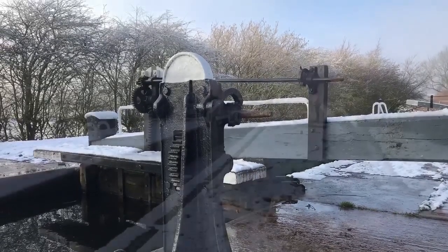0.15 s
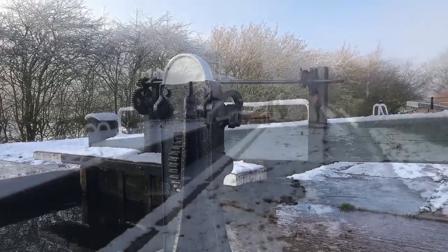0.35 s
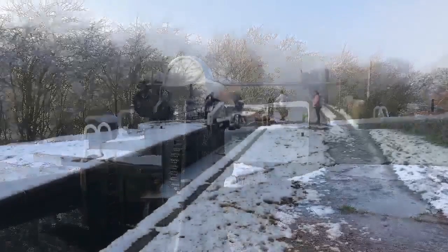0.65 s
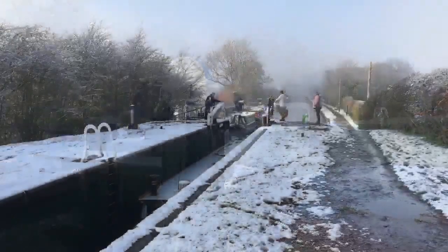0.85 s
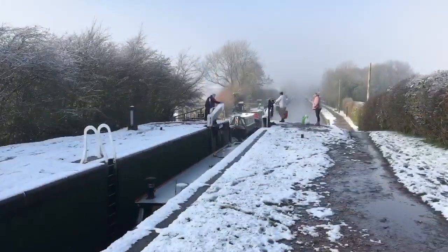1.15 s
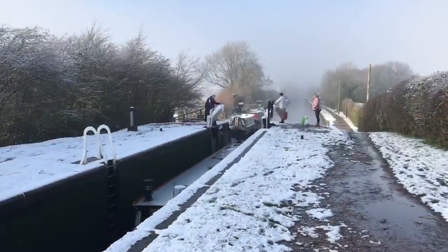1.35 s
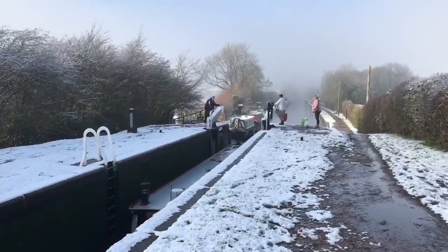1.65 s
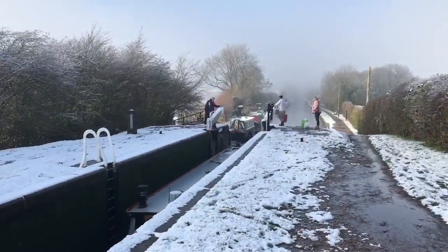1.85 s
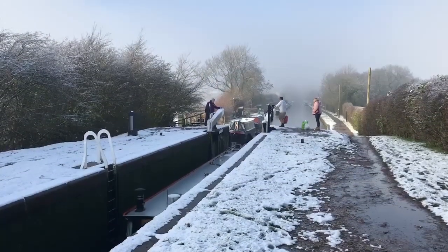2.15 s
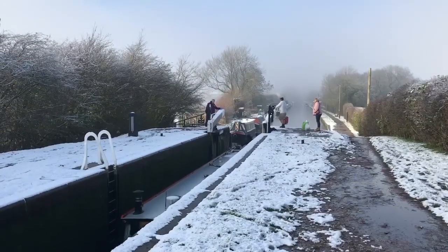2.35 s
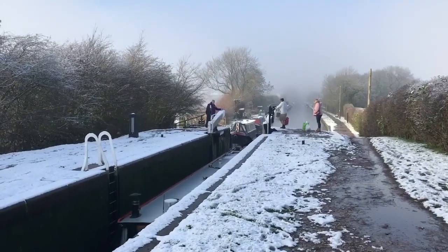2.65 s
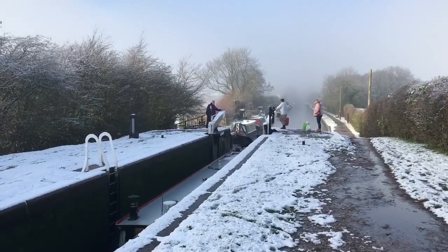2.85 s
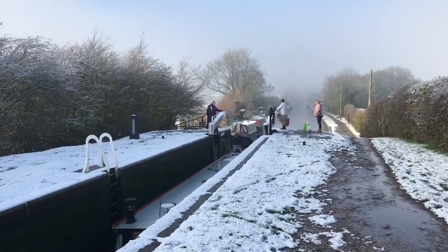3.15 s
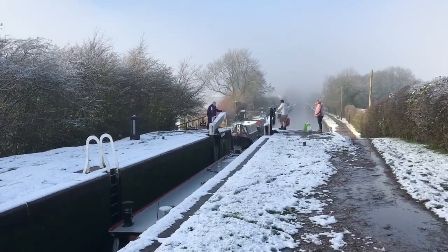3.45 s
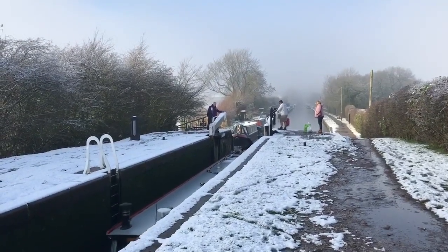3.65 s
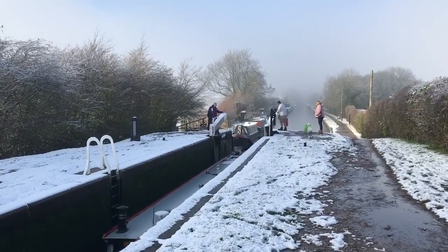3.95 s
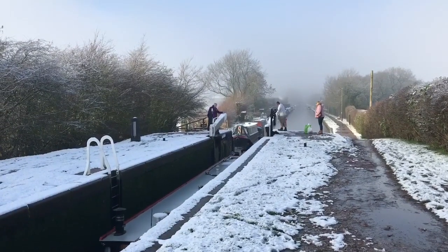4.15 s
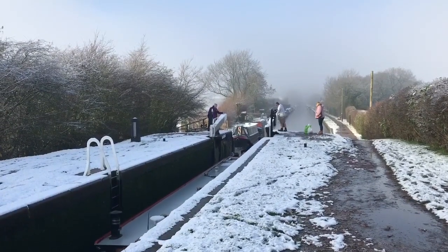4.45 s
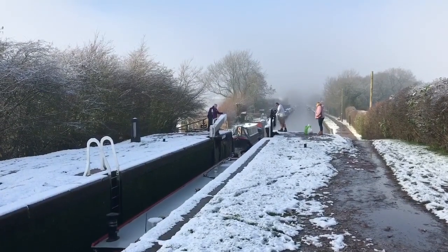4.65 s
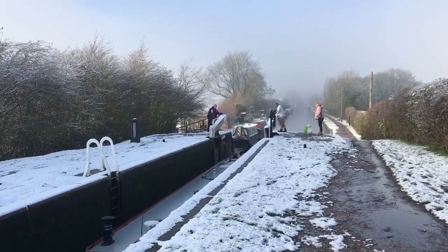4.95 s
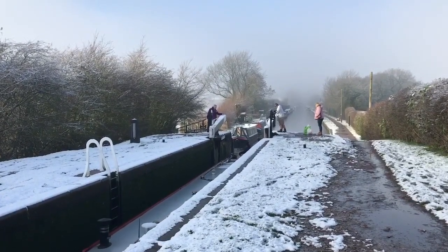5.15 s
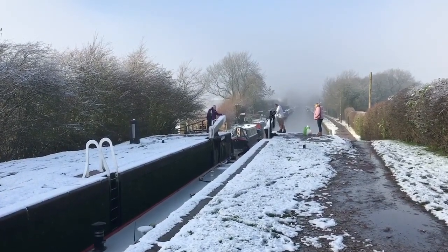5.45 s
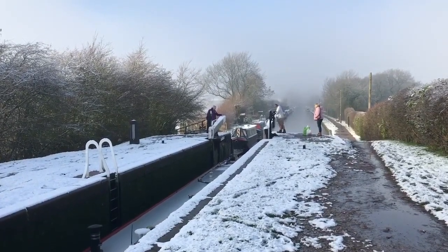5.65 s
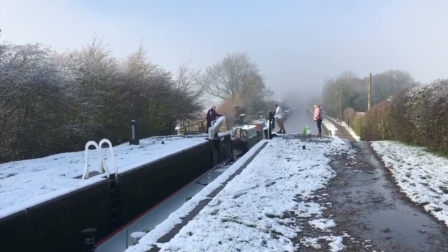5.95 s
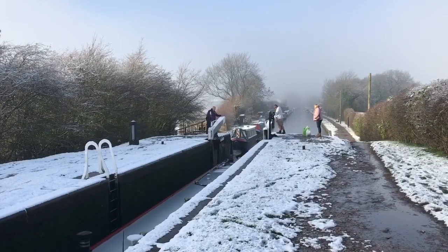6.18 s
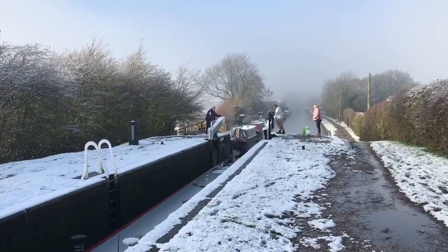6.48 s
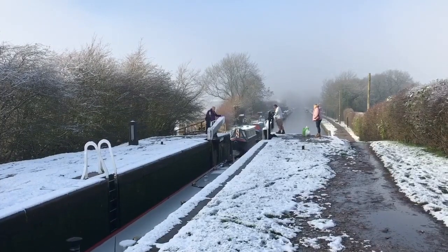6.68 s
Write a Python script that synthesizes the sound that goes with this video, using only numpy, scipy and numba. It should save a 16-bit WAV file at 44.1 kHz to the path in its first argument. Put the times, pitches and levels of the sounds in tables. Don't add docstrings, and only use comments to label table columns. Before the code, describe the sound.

Water hisses and trickles through leaking canal lock gates while a boat diesel idles low, sparrows chirp far off, and the engine finally revs.

```python
import sys
import numpy as np
from scipy import signal
from scipy.fft import rfft, irfft
from scipy.io import wavfile
from scipy.ndimage import uniform_filter1d
from numba import njit

SR = 44100
rng = np.random.default_rng(int(sys.argv[2]) if len(sys.argv) > 2 else 0)


def digitize_waveform(pressure):
    field = np.atleast_2d(pressure).T
    bounded = np.clip(field, -1, 1)
    quanta = np.round(bounded * 32767).astype(np.int16)
    wavfile.write(sys.argv[1], SR, quanta)


def how_loud(loudness_db):
    steps = np.asarray(loudness_db, float) / 20
    return 10 ** steps


N = 300699
FADE_START_S = .064


def level(x, db):
    return x * how_loud(db) / np.sqrt(np.mean(x ** 2))


def columns(table):
    s, *rest = np.transpose(table)
    return [np.interp(np.arange(N) / SR, s, c) for c in rest]


def walk(rate_hz):
    hold = int(SR / rate_hz)
    steps = np.repeat(rng.standard_normal(N // hold + 1), hold)
    return 1.3 * uniform_filter1d(uniform_filter1d(steps, hold), hold)[:N]


def colour(x, spectrum):
    hz, db = np.transpose(spectrum)
    f = np.maximum(np.arange(N // 2 + 1) * SR / N, 1)
    return irfft(rfft(x) * how_loud(np.interp(np.log(f), np.log(hz), db)), N)


def bandpass(x, lo_hz, hi_hz):
    return signal.sosfilt(signal.butter(2, [lo_hz, hi_hz], "band", fs=SR, output="sos"), x)


@njit
def grains(start, hz, t60, size, glide, rise):
    out = np.zeros(N)
    for k in range(len(start)):
        n, phase = int(t60[k] * SR) + 2, 0.
        for i in range(min(n, N - start[k])):
            phase += 2 * np.pi * hz[k] * (1 + (glide[k] - 1) * i / n) / SR
            decay = np.exp(-np.log(1000) * i / n)
            attack = min(i / (rise * n + 1), 1.)
            out[start[k] + i] += size[k] * np.sin(phase) * decay * attack
    return out


def shower(count, lo_hz, hi_hz, cycles, scatter_db, glide, density):
    u = rng.random((count, 3)).T
    share = np.cumsum(density)
    start = np.searchsorted(share / share[-1], u[0])
    hz = lo_hz * (hi_hz / lo_hz) ** u[1]
    size = how_loud(-scatter_db * np.log(u[2] + 1e-4)) * np.sqrt(hz)
    return level(grains(start, hz, cycles / hz, size, np.full(count, glide), 0.047), 0)


def bursts(s, hz, db, t60, spread_oct, smear_s, count=5):
    u = rng.standard_normal((len(s), count, 3))
    start = ((s[:, None] + smear_s * u[..., 0] ** 2) * SR).astype(np.int64).ravel()
    pitch = np.clip(hz[:, None] * 2 ** (spread_oct * u[..., 1]), 400, 9500).ravel()
    size = how_loud(db[:, None] + 1.3 * u[..., 2]).ravel()
    return grains(start, pitch, np.full(len(start), t60), size, np.ones(len(start)), 0.042)


def tones(table, rough, wobble_hz, gain_db):
    out, wobble = np.zeros(N), wobble_hz * walk(250)
    for s, length_s, hz0, hz1, db in table:
        i = int(s * SR)
        n = min(int(length_s * SR), N - i)
        hz = np.linspace(hz0, hz1, n) + wobble[i:i + n]
        tone = np.sin(2 * np.pi * np.cumsum(hz) / SR)
        out[i:i + n] += how_loud(db + gain_db) * np.hanning(n) ** .35 * tone
    return out * (1 - rough + rough * walk(350))


def swell():
    fade_s = 0.94
    return np.clip((np.arange(N) / SR - FADE_START_S) / fade_s, 0, 1)


def spray(flow_db):
    # f/Hz, level/dB per Hz
    spectrum = [(200, -37.5), (350, -11), (440, -9.5), (590, -4), (750, -9), (1350, -7), (2250, -5.5),
                (3250, -4.5), (4850, -6.5), (6400, -6), (8600, -9), (9100, -11), (9500, -39.5),
                (10500, -70.5)]
    surge, hiss = walk(30), 0
    for hz in 300 * 2 ** np.arange(0, 5.1, .5):
        flicker_db = 0.54 * surge + 1.16 * walk(16) + 0.5 * walk(5)
        hiss = hiss + how_loud(flicker_db) * bandpass(rng.standard_normal(N), hz / 2 ** 0.25, hz * 2 ** 0.3)
    u = rng.random((2200, 3)).T
    splatter = bursts(u[0] * N / SR, 1500 * 4.95 ** u[1], 11.4 * u[2] ** 2,
                      t60=0.0061, spread_oct=0.46, smear_s=.0008)
    density = how_loud(3.0 * surge)
    fizz = shower(count=9000, lo_hz=847, hi_hz=9500, cycles=11.5, scatter_db=2.0, glide=1.0, density=density)
    bubbles = shower(count=1500, lo_hz=682.6, hi_hz=7000, cycles=48.0, scatter_db=1.0, glide=1.114,
                     density=density)
    mix = level(hiss, 0) + level(splatter, -4) + how_loud(-8.5) * fizz + how_loud(-13.0) * bubbles
    return level(colour(mix, spectrum), -1.55) * how_loud(flow_db)


def churn(flow_db):
    # f/Hz, level/dB per Hz
    spectrum = [(30, -10.5), (48, -3.5), (70, 0), (97, -1.5), (150, -2), (230, -8), (320, -13),
                (450, -21.5), (700, -62)]
    # t/s, peak/dB
    slap_table = [
        (1.05, -64),
        (1.4, -59),
        (2.62, -45.5),
        (3.24, -53),
        (4.02, -49),
        (5.74, -54),
        (6.28, -62),
    ]
    churn_db, swell_db_per_db, floor_db = -52, 1.6, -68.5
    rise_s, fall_s = .12, .15
    body_db = churn_db + swell_db_per_db * (flow_db - np.median(flow_db)) + 1.4 * walk(8.9)
    body = level(colour(rng.standard_normal(N), spectrum), 3.5) * how_loud(body_db)
    slop = colour(rng.standard_normal(N), [(18, -13), (28, 0.0), (40, 4.5), (55, -10), (80, -38.0)])
    t, slaps = np.arange(N) / SR, how_loud(floor_db)
    for s, db in slap_table:
        slaps = slaps + how_loud(db) * np.exp(-np.abs(t - s) / np.where(t < s, rise_s, fall_s))
    return body + level(slop, -10) * slaps


def diesel():
    # t/s, firing rate/Hz, load/dB, chamber boom on multiple 2/dB
    engine = [(.07, 28.48, -40, -4), (.69, 28.14, -40.5, -6.5), (1.33, 28.23, -40.5, 0),
              (2.36, 28.4, -40.5, 2), (3.26, 28.34, -37.5, -0.1), (5.25, 28.36, -41.5, 5),
              (5.7, 28.78, -37, 0.2), (6.0, 29.03, -38.5, -3.5), (6.2, 28.97, -39, -3),
              (6.42, 26.75, -41, 3), (6.47, 27.3, -36.5, -2), (6.6, 29.56, -36.5, 3), (6.65, 30.8, -36, 1),
              (6.69, 35.8, -37.5, 5), (6.71, 38.3, -23.5, -1), (6.755, 39.6, -20.5, 2),
              (6.79, 43, -21.5, -1), (6.81, 46.8, -28, .1)]
    # f/Hz, gain/dB
    silencer = [(95, -0.5), (105, -9), (114, -23), (124, -24), (144, -11)]
    # t/s, half length/s, multiple 2/dB, multiple 3/dB
    stumbles = [
        (2.408, .03, -9, -2),
        (2.603, 0.036, -11, 0),
        (2.71, 0.022, 3, -6),
        (2.766, .05, -7, -9),
        (6.373, .04, -1, -3),
        (6.537, .055, -1, -13),
    ]
    # multiple/1, level re multiple 3/dB
    overtones = [(1, -27), (1.5, -33), (2.5, -27), (4, -21), (5, -27), (6, -27), (7, -26), (8, -24),
                 (10, -33)]
    # f/Hz, half width/Hz, gain/dB
    bark_pipe = [(151, 22, 0.5), (247, 18, -4), (319, 12, 2)]
    bark_s, bark_rise_s, bark_db = 6.57, .085, -42

    t = np.arange(N) / SR
    hz, load_db, boom_db = columns(engine)
    second_db = load_db + boom_db
    third_db = load_db + np.interp(3 * hz, *np.transpose(silencer))
    for s, half_s, db2, db3 in stumbles:
        dent = np.clip(1 - np.abs(t - s) / half_s, 0, 1)
        second_db, third_db = second_db + db2 * dent, third_db + db3 * dent
    turn = 2 * np.pi * np.cumsum(hz * (1 + 0.00084 * walk(9.9))) / SR + 1.202
    out = how_loud(second_db + 0.47 * walk(15)) * np.sin(2 * turn)
    out += how_loud(third_db + 0.38 * walk(15)) * np.sin(3 * turn + 0.81)
    for k, db in overtones:
        out += how_loud(third_db + db + 2.0 * walk(9)) * np.sin(k * turn + k * k)

    cycle = turn / (2 * np.pi) % 1
    firing = np.exp(-cycle / .12) * (1 + 0.66 * rng.standard_normal(N))
    pipe = sum(how_loud(db) * bandpass(firing, f - w, f + w) for f, w, db in bark_pipe)
    bark = level(pipe, bark_db) * np.clip((t - bark_s) / bark_rise_s, 0, 1) ** 2
    return np.sqrt(2) * out + bark


def hum():
    hum_hz, hum_db = 120.1, -56
    phase = 2 * np.pi * np.cumsum(hum_hz * (1 + 0.00598 * walk(3))) / SR
    return np.sqrt(2) * how_loud(hum_db + 1.8 * walk(3.7)) * np.sin(phase)


def sparrows():
    # t/s, length/s, f/Hz, peak/dB
    note_table = [(.19, .06, 5500, -62), (.629, .033, 4050, -42), (.666, .024, 3350, -50),
                  (1.085, .05, 3820, -41), (1.49, .025, 3000, -43), (2.15, .028, 4050, -44),
                  (2.169, .045, 3270, -40), (2.512, .032, 4780, -40), (3.727, .025, 3210, -41),
                  (4.545, .019, 4570, -44), (4.556, .026, 4070, -39), (4.578, .025, 3640, -43),
                  (4.605, .035, 2800, -41), (5.771, .031, 4490, -41), (5.778, .037, 3900, -44),
                  (5.81, .021, 3060, -43), (5.826, .042, 3420, -39), (6.316, .024, 5220, -45),
                  (6.329, .036, 4610, -43), (6.381, .021, 4600, -43), (6.432, .026, 3760, -38),
                  (6.455, .02, 4600, -43), (6.722, .04, 4900, -41), (6.718, .031, 5280, -46),
                  (6.75, .025, 4070, -43), (6.79, .03, 4670, -42)]
    # t/s, length/s, start f/Hz, peak/dB
    chirp_table = [
        (.65, 0.043, 3850, -43),
        (1.445, .065, 4400, -41),
        (2.125, .06, 4970, -40),
        (2.54, .06, 4700, -44),
        (3.695, .04, 3950, -42),
        (4.548, .07, 4630, -41),
        (5.775, .04, 4640, -43),
        (6.31, .05, 5400, -42),
        (6.39, .05, 4700, -42),
        (6.725, .055, 5250, -46),
    ]

    def slide(table, hz_per_s):
        return [(s, n, hz, hz + hz_per_s * n, db) for s, n, hz, db in table]

    notes = tones(slide(note_table, -1000), rough=.3, wobble_hz=70, gain_db=1)
    slurs = tones(slide(chirp_table, -25000), rough=.42, wobble_hz=260, gain_db=0)
    return notes + slurs


def ticks(table, t60, spread_oct, crack_db, ring_db):
    s, db, hz = np.transpose(table)
    splash = bursts(s, hz, db + crack_db, t60, spread_oct, smear_s=.0004)
    start = (s * SR).astype(np.int64)
    return splash + grains(start, hz, 18 / hz, how_loud(db + ring_db), np.full(len(s), 1.03), .05)


def splash_ticks():
    # t/s, peak/dB, ring f/Hz
    low_ticks = [(.867, -29, 2130), (.998, -23, 2050), (1.0525, -28, 2260), (1.1321, -23, 2470),
                 (1.2262, -24, 2140), (1.287, -22, 1890), (1.3014, -18, 2920), (1.6436, -30, 2020),
                 (1.78, -27, 1750), (2.034, -27.5, 3130), (2.0618, -25.5, 1610), (2.3681, -18, 1930),
                 (2.4218, -24, 1620), (2.499, -26, 2490), (2.564, -24, 2920), (2.6945, -25, 2000),
                 (2.8435, -23, 1970), (2.8929, -23, 2055), (2.9623, -29, 3100), (3.3569, -24, 2130),
                 (3.5115, -23, 3100), (3.5863, -23, 3220), (3.736, -20, 3320), (3.8133, -25, 1770),
                 (4.0839, -27.5, 2300), (4.5846, -27.5, 2160), (5.379, -25, 2200), (5.4228, -22, 2180),
                 (6.0492, -31.5, 1460), (6.505, -27, 1550)]
    # t/s, peak/dB, ring f/Hz
    high_ticks = [(.7125, -24, 5560), (1.2337, -27, 5550), (1.2592, -28, 5930), (1.4477, -28, 5100),
                  (1.4726, -33, 3660), (1.7455, -28.5, 7000), (1.812, -30, 3940), (2.0633, -27, 5900),
                  (2.2594, -25, 4080), (2.3576, -28, 5750), (2.4218, -29, 7960), (2.4335, -24.5, 5460),
                  (2.8434, -30, 5495), (2.8954, -28, 4220), (3.4163, -31, 4330), (3.512, -29, 5200),
                  (4.3934, -29.5, 6460), (4.7198, -34, 5860), (4.735, -22.5, 5800), (4.9478, -29, 3650),
                  (4.4794, -30, 3300), (4.7953, -29, 3070), (5.1, -29.5, 1600), (5.0625, -32.5, 4030),
                  (5.1687, -31, 5530), (5.6302, -27, 5270)]
    low = ticks(low_ticks, t60=.007, spread_oct=.42, crack_db=-12, ring_db=-6)
    return low + ticks(high_ticks, t60=0.0056, spread_oct=.32, crack_db=-7.5, ring_db=-4)


def plinks():
    # t/s, f/Hz, peak/dB
    plink_table = [(.829, 6440, -50), (.899, 2250, -45), (.995, 1850, -43), (1.04, 820, -48),
                   (1.051, 1450, -47), (1.205, 620, -51), (1.218, 6630, -48), (1.232, 5720, -47),
                   (1.772, 5950, -45), (2.035, 800, -46), (2.417, 1590, -42), (2.459, 1650, -42),
                   (2.841, 1450, -44), (3.352, 2260, -41), (3.511, 5290, -49), (3.855, 2940, -44),
                   (4.476, 3950, -44), (4.87, 5200, -47), (5.165, 5800, -45), (5.19, 5500, -47),
                   (5.281, 2170, -43), (5.418, 1550, -46), (5.494, 5080, -49)]
    length_s, rise = .025, 1.015
    glides = [(s, length_s, hz, hz * rise, db) for s, hz, db in plink_table]
    return tones(glides, rough=.3, wobble_hz=80, gain_db=1)


def gushes():
    # t/s, length/s, centre f/Hz, level/dB
    gush_table = [(.85, .2, 2100, -44), (1.218, 0.15, 6740, -42.5), (1.294, 0.043, 3110, -42),
                  (2.418, .11, 2000, -41), (2.547, .1, 4340, -41), (2.842, .07, 2220, -50),
                  (3.81, .11, 1840, -42.5), (5.151, 0.093, 5070, -42.5), (5.277, 0.14, 2620, -46.5),
                  (6.043, .08, 1980, -44), (6.62, 0.095, 1190, -46)]
    s, length_s, hz, db = (np.repeat(c, 40) for c in np.transpose(gush_table))
    start_s = s + length_s * rng.random(len(s)) ** 1.3
    return bursts(start_s, hz, db, t60=0.01, spread_oct=.35, smear_s=.001, count=3)


def knocks():
    # t/s, peak/dB, f/Hz, t60/s
    knock_table = [
        (1.88, -55, 48, 0.17),
        (2.05, -50, 40, .25),
        (2.39, -42, 50, .2),
        (2.58, -52, 52.06, .2),
        (2.68, -37, 63.3, .25),
        (3.18, -46, 46, 0.18),
        (3.97, -41, 48, .2),
        (5.72, -42, 46.3, 0.21),
    ]
    s, db, hz, t60 = np.transpose(knock_table)
    return grains((s * SR).astype(np.int64), hz, t60, how_loud(db), np.ones(len(s)), 0.069)


def stone_tail(x):
    t = np.arange(SR // 5) / SR
    tail = rng.standard_normal(len(t)) * np.exp(-np.log(1000) * t / .13)
    return how_loud(-9) * signal.fftconvolve(x, tail / np.sqrt(np.sum(tail ** 2)))[:N]


def scene():
    # t/s, level/dB
    flow = [(.07, -41.5), (1.4, -41), (1.6, -41), (2.62, -40), (3.0, -41), (3.3, -41), (4.0, -41.5),
            (5.35, -40), (5.6, -42), (6.28, -41), (6.4, -40)]
    flow_db, = columns(flow)
    steady = spray(flow_db) + churn(flow_db) + diesel() + hum()
    events = sparrows() + splash_ticks() + plinks() + gushes()
    events += stone_tail(events)
    return (swell() * steady + events + knocks())[None]


def dropouts(x):
    # f/Hz, share/1
    silent_share = [(3500, 0), (4950, .03), (5500, .006), (7650, .11), (8400, .04), (8950, .3), (9250, .85),
                    (9480, 1)]
    f, _, z = signal.stft(x, SR, "cosine", nperseg=2048, noverlap=1024)
    bands = np.arange(len(f)) // 6
    frames = z.shape[-1]
    luck = rng.random((bands[-1] + 1, frames // 2 + 1))[bands]
    luck = luck.repeat(2, axis=1)[:, :frames]
    keep = luck > np.interp(f, *np.transpose(silent_share))[:, None]
    return signal.istft(z * keep, SR, "cosine", nperseg=2048, noverlap=1024)[1][..., :N]


def band_limit(x):
    return signal.sosfilt(signal.butter(12, 9640, fs=SR, output="sos"), x)


def record(dry):
    # f/Hz, width/Hz, depth/dB
    dips = [(1810, 200, -2), (2610, 88, -2.5), (4720, 100, -2), (7740, 390, -2.5)]
    f = np.arange(N // 2 + 1) * SR / N
    dips_db = sum(db * np.exp(-((f - hz) / width_hz) ** 2) for hz, width_hz, db in dips)
    notched = irfft(rfft(dry) * how_loud(dips_db), N)
    ramp = np.clip((np.arange(N) / SR - FADE_START_S) / 0.019, 0, 1) ** 2
    top_cut = signal.ellip(10, .2, 80, 9500, fs=SR, output="sos")
    mix = signal.sosfilt(top_cut, dropouts(notched) * ramp)
    return band_limit(mix)


dry = scene()
out = record(dry)
digitize_waveform(out)
```